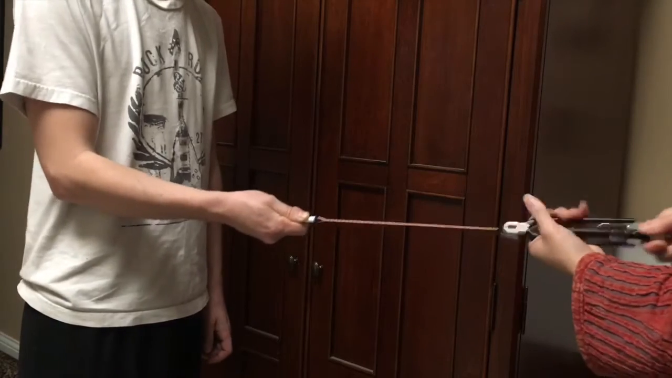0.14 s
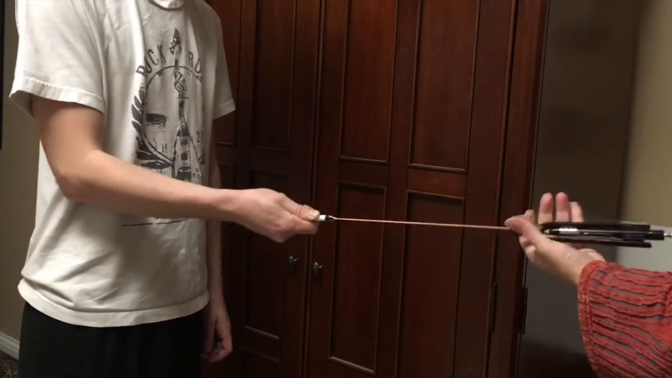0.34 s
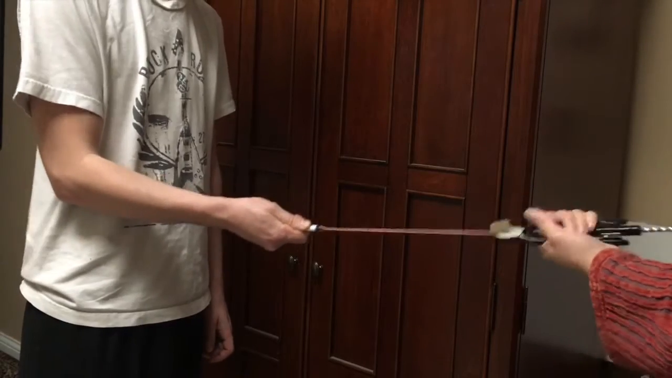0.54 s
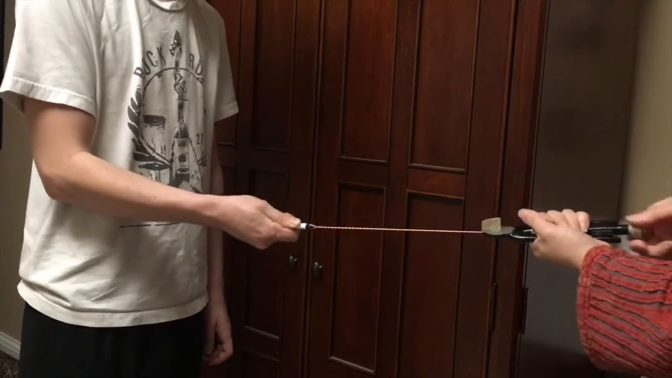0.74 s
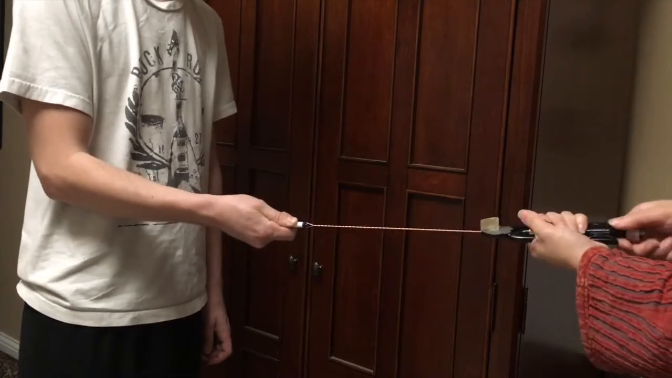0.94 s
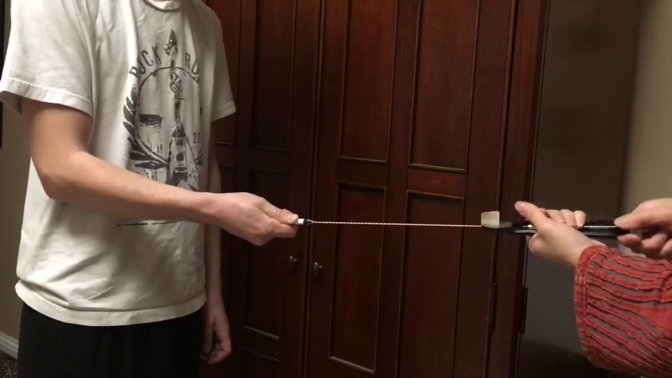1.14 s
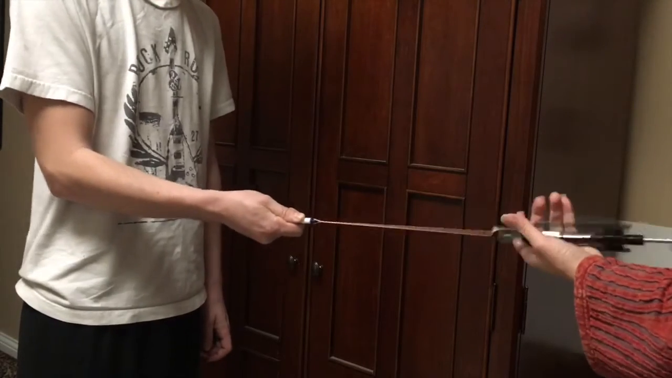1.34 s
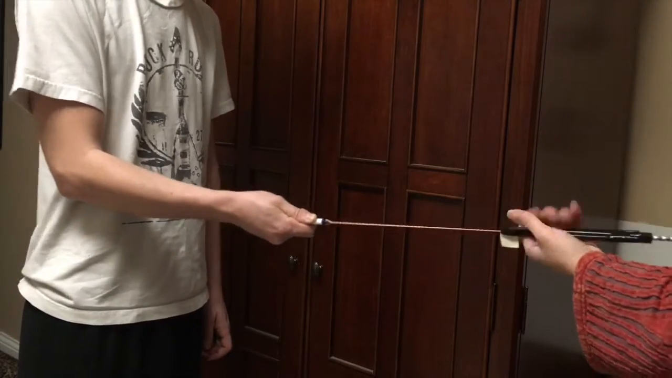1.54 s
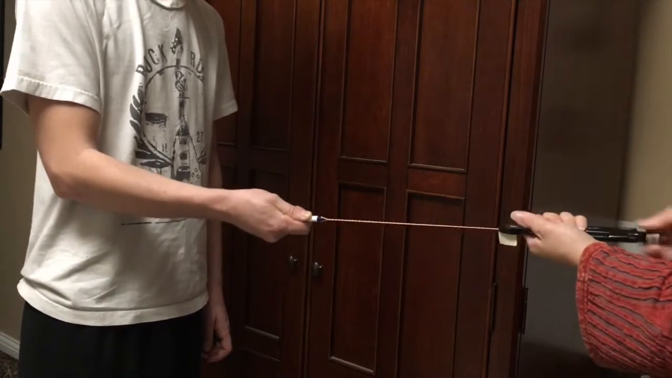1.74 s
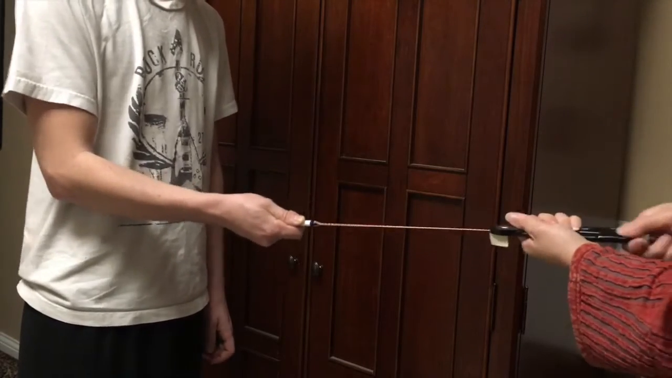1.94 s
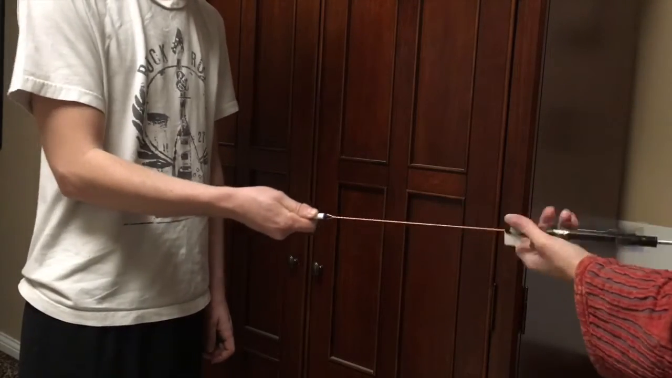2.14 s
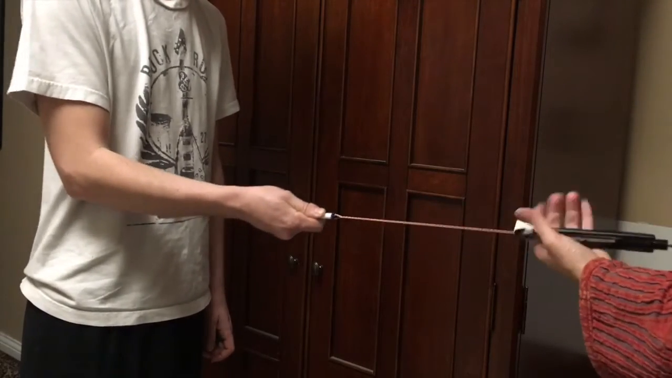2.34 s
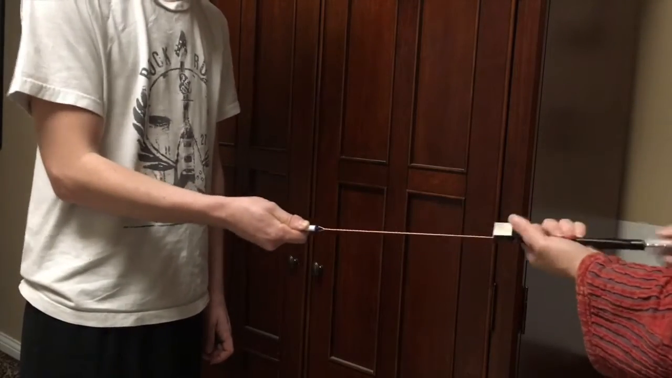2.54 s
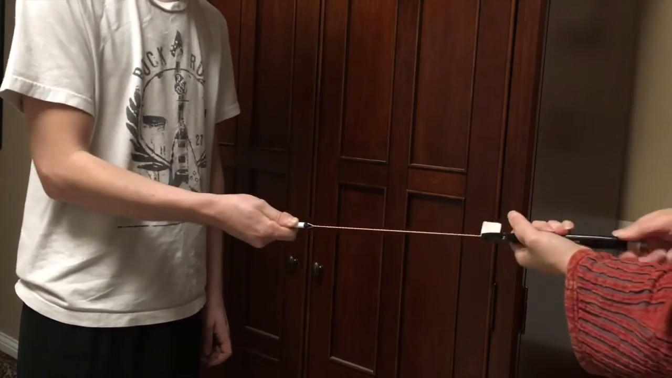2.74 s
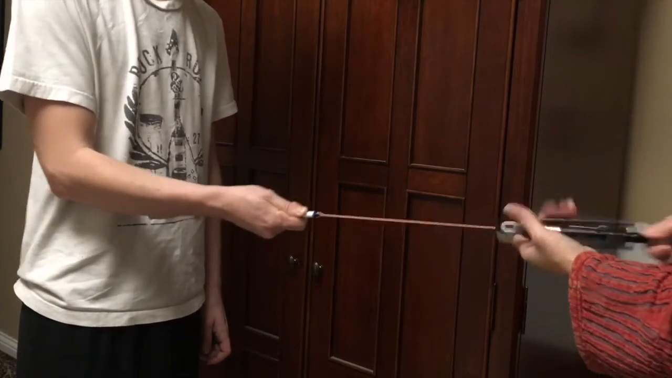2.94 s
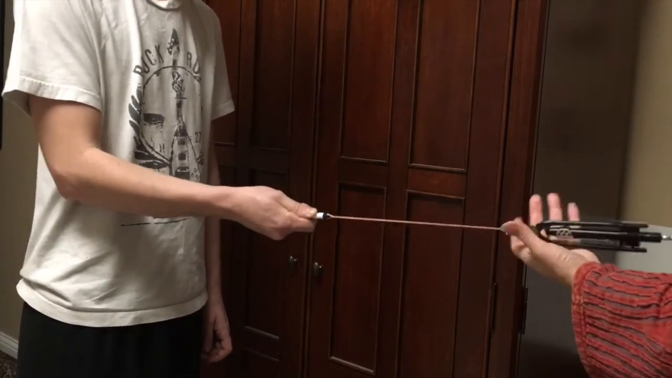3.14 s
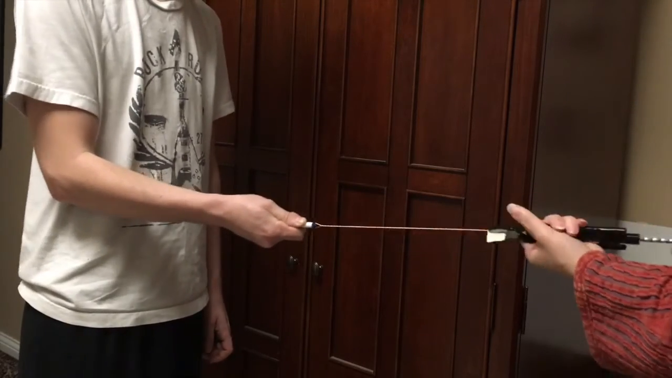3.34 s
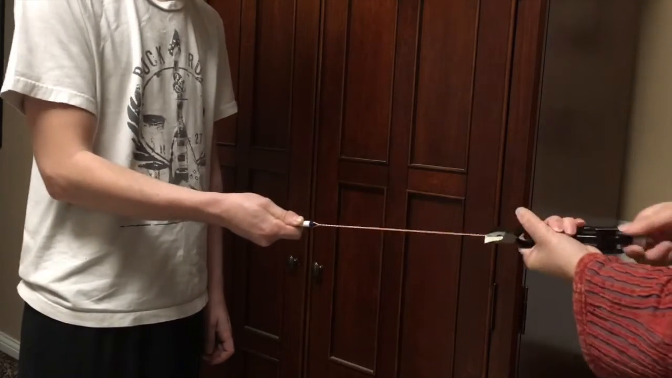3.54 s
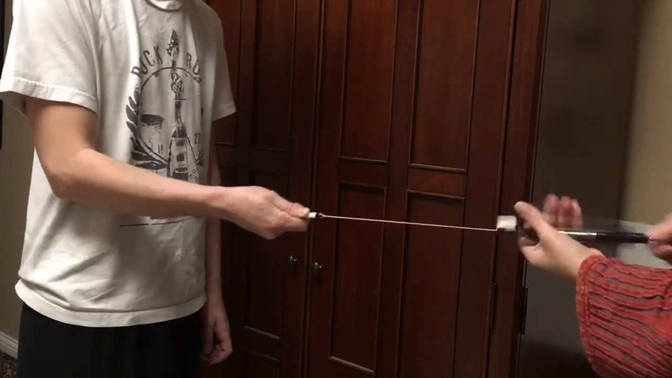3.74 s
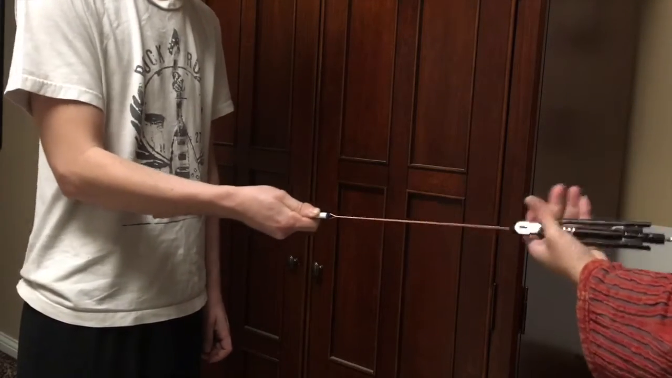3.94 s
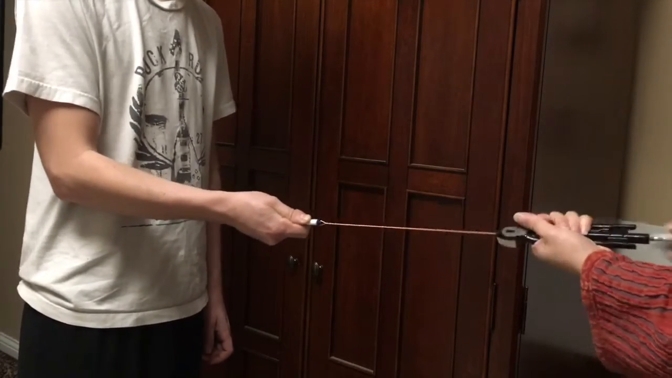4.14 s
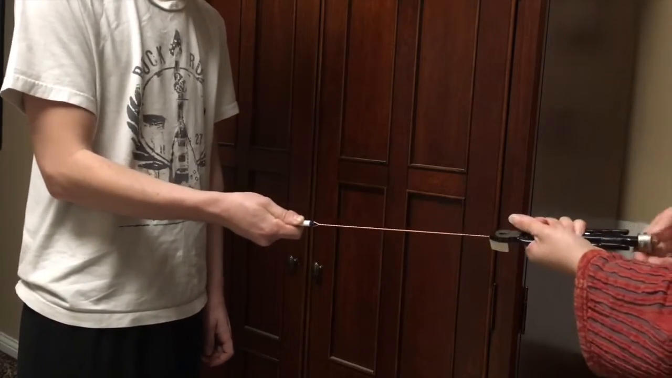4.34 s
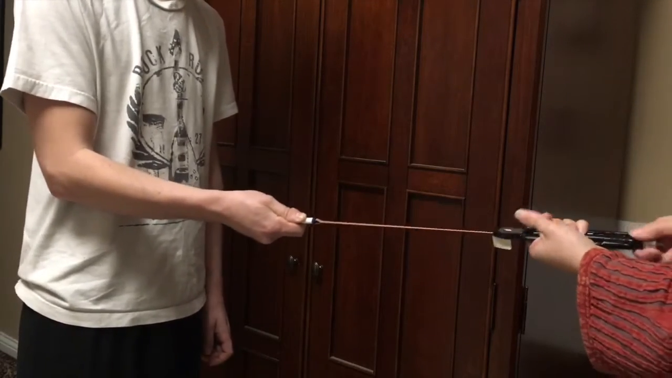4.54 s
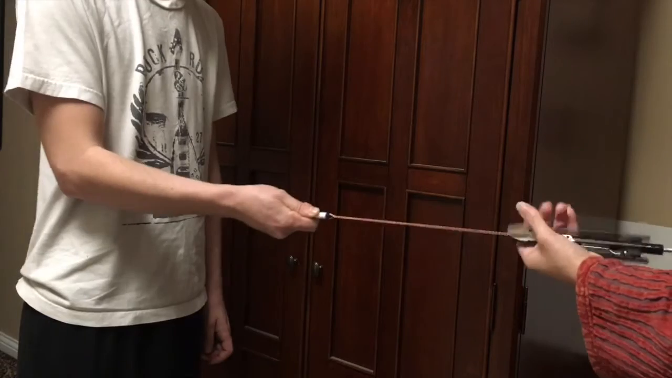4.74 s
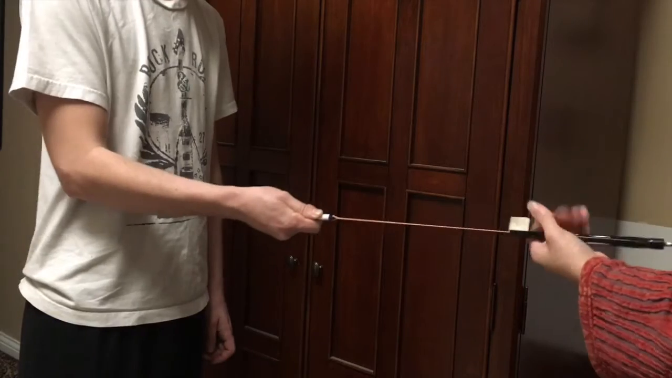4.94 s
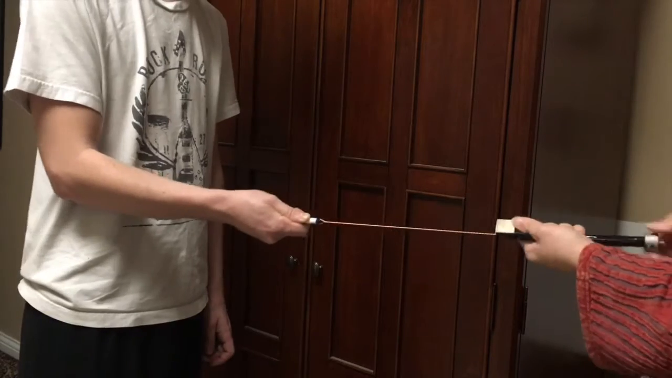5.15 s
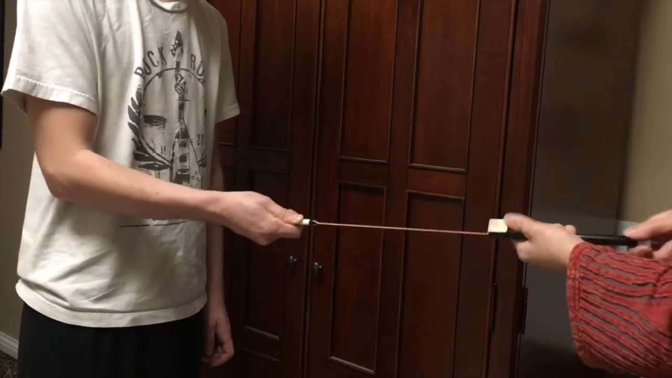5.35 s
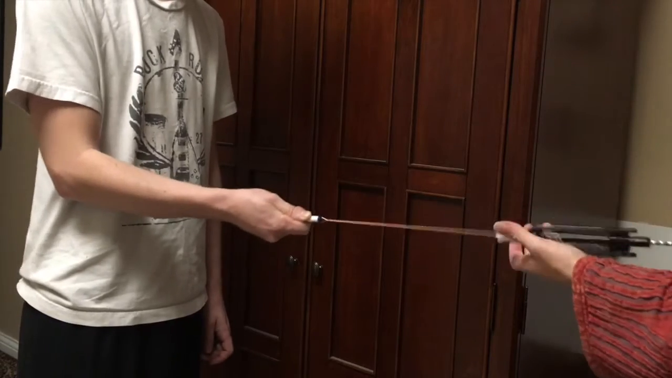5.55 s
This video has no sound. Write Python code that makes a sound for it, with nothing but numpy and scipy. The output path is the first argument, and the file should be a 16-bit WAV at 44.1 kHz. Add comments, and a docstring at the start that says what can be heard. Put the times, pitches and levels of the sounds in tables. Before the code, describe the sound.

A quiet indoor room with faint low motor hum, soft rumble and thin hiss. The ringing tail of a steel slam is already fading at the start. Hand-pumped twisting pliers then cycle: a brief gritty metallic rasp swells and ends in a thin bright click, at about 0.3, 1.4, 2.2, 3.1, 3.9, 4.8 and 5.6 seconds. The pull at 1.4 is longer, with palm rubbing around it. Most pulls carry a small loose double rattle. Light ticks follow as the hand catches the handles, then a very short rising slide and rattle lead into a hard, bright steel slam at roughly 0.7, 1.8, 2.6, 3.5, 4.2 and 5.2. Slams are by far the loudest, sharp and briefly ringing, with a quick rebound and short room tail. Soft grip shifts and faint bumps fill gaps; it ends just after the last click.

```python
"""A quiet room with a faint motor hum, and the last of a steel slam; then pliers twist a taut safety wire.
Pulls on the knob spin them on a spiral rod: a swelling rasp, in most pulls a rattle, a click at the end stop.
A hand catches them with small ticks; the rod slides home, rattles and slams into its seat; the grip shifts.
Scrapes and blows are shaped noise plus dying rings of the steel, heard in the room; the hum is a stack of
wavering tones; rumble, hiss, rubbing and soft bumps are filtered noise; a faint low drone glides now and then."""
import sys
import numpy as np
from scipy import signal
from scipy.fft import rfft, irfft
from scipy.io import wavfile
from scipy.ndimage import uniform_filter1d

SR = 44100
rng = np.random.default_rng(int(sys.argv[2]) if len(sys.argv) > 2 else 0)


def to_wav(sig):
    """Store sig (one row per channel, or 1-D mono) as 16-bit WAV at the path in sys.argv[1].

    Samples outside -1..1 are clipped; the rate is SR.
    """
    pcm = np.clip(np.atleast_2d(sig), -1, 1) * 32767
    pcm = np.round(pcm).astype(np.int16)
    wavfile.write(sys.argv[1], SR, pcm.T)  # frames by channels


N = 246959  # samples


def amp(db):
    """Turns decibels into a gain."""
    return 10 ** (np.asarray(db) / 20)


def unit(x):
    """Scales a sound to energy 1 (its squares add up to 1)."""
    return x / np.sqrt(np.sum(x ** 2) + 1e-20)


def evened(x):
    """Scales a sound to rms 1 (the average strength)."""
    return unit(x) * np.sqrt(len(x))


def struck(x):
    """Scales a blow to the energy of 3 ms of sound at rms 1."""
    return unit(x) * np.sqrt(.003 * SR)


def add(mix, s, sound):
    """Mixes a sound in at a time in seconds; whatever lies before zero is cut off."""
    at = round(s * SR)
    sound = sound[max(-at, 0):]
    part = mix[max(at, 0):][:len(sound)]
    part += sound[:len(part)]


def read(points, hz):
    """Reads a table of (pitch, value) between its points, along a log-frequency axis."""
    f, value = np.transpose(points)
    return np.interp(np.log(hz + 1), np.log(f + 1), value)


def causal(x, gain):
    """Filters without any sound ahead of its cause; gain covers the full frequency circle."""
    # minimum phase: the phase follows from the log of the gain
    spectrum = np.exp(np.conj(signal.hilbert(np.log(gain))))
    taps = np.fft.ifft(spectrum).real
    return signal.fftconvolve(x, taps[:len(gain) // 2])[:len(x)]


def colour(x, points, tilt_db=0, size=2048):
    """Gives a sound a spectrum; above 1500 Hz it is also tilted by tilt_db per octave around 5500 Hz."""
    hz = abs(np.fft.fftfreq(size, 1 / SR))
    octaves = np.log2(np.maximum(hz, 1500) / 5500)
    return causal(x, amp(read(points, hz) + tilt_db * octaves))


def swell(s, half_length_s, db, steepness=3.53):
    """A smooth rise and fall around one moment, down to 1/e half_length_s away from it."""
    distance = abs((np.arange(N) / SR - s) / half_length_s)
    return amp(db) * np.exp(-distance ** steepness)


def waver(rate_hz, count=20):
    """Slow random wandering of rms 1: many slow sines, the slower the stronger."""
    t = np.arange(0, N, 256) / SR
    rates = np.geomspace(rate_hz / 10, rate_hz, count)
    slow = sum(np.sin(2 * np.pi * (f * t + rng.random())) / np.sqrt(f) for f in rates)
    return evened(np.interp(np.arange(N) / SR, t, slow))


# colour of the room rumble: pitch_hz, level_db (per Hz, relative)
RUMBLE = [(20, -41.5), (35, -16), (55, 7), (110, 1), (290, 0.5), (380, -4), (550, -11), (900, -15),
          (1500, -27), (4000, -58.5)]
# colour of the hiss: pitch_hz, level_db (per Hz, relative)
HISS = [(300, -17.5), (1000, 15), (1600, 7), (4000, 5), (8000, 5), (15500, -15.5)]
RUMBLE_DB, HISS_DB = -63, -72.5
# faint low drones, one list a swell: time_s, pitch_hz, level_db
DRONES = [
    [(.7, 122, -69), (1.6, 114, -67), (2.1, 111.3, -62), (2.6, 121, -70.5)],
    [(2.9, 69.4, -73), (4.05, 80, -64.5), (4.9, 83.7, -67)],
]


def background():
    """Filtered noise makes room rumble and thin hiss; gliding sines make a faint drone."""
    out = amp(RUMBLE_DB) * evened(colour(rng.standard_normal(N), RUMBLE, size=8192))
    out += amp(HISS_DB) * evened(colour(rng.standard_normal(N), HISS))
    for points in DRONES:
        s, hz, db = np.transpose(points)
        at = np.arange(s[0], s[-1], 1 / SR)
        cycles = np.cumsum(np.interp(at, s, hz)) / SR
        tone = np.sqrt(2) * np.sin(2 * np.pi * cycles)
        fade = signal.windows.tukey(len(at), .15)
        add(out, s[0], amp(np.interp(at, s, db)) * tone * fade)
    return out


SHAFT_HZ = 23.96
# tones of the hum: multiple (of the shaft speed), level_db (before wavering)
HUM = [(5, -75), (6, -88.5), (7, -72), (8, -75), (9, -71.5), (10, -86), (11, -69.5), (13, -93), (34, -82),
       (41, -83.5)]
# the strongest tone, on its own multiple, swells and fades: time_s, level_db (before wavering)
HUM_MAIN = [(0.0, -65), (1.36, -55), (3.66, -64), (3.74, -59.5), (5.54, -62), (5.6, -76)]
HUM_MAIN_MULTIPLE = 12


def hum():
    """An appliance hums on multiples of its shaft speed; each tone wavers in level and phase."""
    t, out = np.arange(N) / SR, np.zeros(N)
    main_db = np.interp(t, *np.transpose(HUM_MAIN))
    for multiple, db in list(HUM) + [(HUM_MAIN_MULTIPLE, main_db)]:
        phase = 2 * np.pi * (round(multiple) * SHAFT_HZ * t + rng.random())
        level = np.sqrt(2) * amp(db + 1.8 * waver(rate_hz=5))
        out += level * np.sin(phase + 0.47 * waver(rate_hz=16))
    return out


# how long the room rings: pitch_hz, t60_s (time to fall by 60 dB)
ROOM = [(300, 0.249), (1500, 0.34), (4000, 0.36), (9000, 0.3), (12000, 0.18), (16000, 0.21)]
# first echoes: delay_s, gain
ECHOES = [(.0026, 0.22), (.0056, 0.22), (.0077, 0.18), (.0098, .18), (0.0145, 0.05)]


def room(x, wet_db):
    """Direct sound, a few early echoes, and a scattered tail of noise that dies at its own pace per pitch."""
    t = np.arange(SR // 2) / SR
    hz, at, z = signal.stft(rng.standard_normal(len(t)), SR, nperseg=256)
    fading = amp(-60 * at / read(ROOM, hz)[:, None])
    tail = signal.istft(z * fading, SR)[1][:len(t)]
    build_up = 1 - np.exp(-t / 0.0028)
    response = amp(wet_db) * unit(tail * build_up)
    response[0] += 1
    for s, gain in ECHOES:
        add(response, s, np.array([gain]))
    return signal.fftconvolve(x, response)


def ring(hz, t60):
    """One dying tone of energy 1 that builds up over about its first cycle."""
    t = np.arange(SR // 3) / SR
    tone = np.sin(2 * np.pi * (hz * t + rng.random()))
    build_up = 1 - np.exp(-hz * t)
    return unit(tone * build_up * np.exp(-np.log(1000) * t / t60))


def cluster(hz, t60, count=6):
    """A group of close, damped tones, strongest in the middle."""
    spread = np.linspace(.945, 1.055, count) + rng.uniform(-.006, .006, count)
    weights = np.hanning(count + 2)[1:]
    return unit(sum(ring(hz * k, t60) * weight for k, weight in zip(spread, weights)))


# ringing tones of the steel tool, damped by the hands: pitch_hz, level_db (relative, before a random change)
STEEL = [(1700, -8), (2448, -3), (2503, -22), (2804, -10), (3076, -2), (3428, -2.5), (3591, -11.5),
         (4134, -8), (4330, -12.5), (5471, 16), (5947, -20), (6297, -37), (6835, -11), (7046, 7.5),
         (7600, 7), (9631, -8.5), (9850, -9.5), (9975, -4), (11363, 21), (11669, -8)]
STEEL_T60 = .22  # s


def steel():
    """The tool's ringing tones; every call shares the energy among them a little differently."""
    return unit(sum(amp(db + 2 * rng.standard_normal()) * ring(hz, STEEL_T60) for hz, db in STEEL))


def contact(crack_s, chatter_db, chatter_s, size=2048):
    """Steel meets steel: a burst of noise that dies at two paces, crack and chatter, evened over all pitches."""
    t = np.arange(SR // 3) / SR
    envelope = np.exp(-t / crack_s) + amp(chatter_db) * np.exp(-t / chatter_s)
    burst = rng.standard_normal(len(t)) * envelope
    power = uniform_filter1d(abs(np.fft.fft(burst, size)) ** 2, size=15, mode="wrap")
    return unit(causal(burst, 1 / np.sqrt(power)))


def grit(length, per_s, count=32):
    """Tiny slips of uneven size, each ringing for 35 cycles at its own pitch; high ones come thicker."""
    out, pitches = np.zeros(length), np.geomspace(1800, 15500, count)
    for hz in pitches:
        happens = rng.random(length) < per_s * hz / pitches.sum() / SR
        slips = rng.uniform(0.11, 1, length) * happens
        chirp = ring(hz * rng.uniform(.95, 1.05), t60=35 / hz)
        out += signal.fftconvolve(slips, chirp[:length])[:length]
    return evened(out)


SNAGS_PER_S, SNAG_DB = 110, -3.5  # average count; level beside the steady scraping


def snags(length):
    """The rod snags in its sleeve: brief spurts of noise at random moments."""
    starts = rng.uniform(.3, 1, length) * (rng.random(length) < SNAGS_PER_S / SR)
    spurt = np.exp(-np.arange(SR // 100) / SR / .0007)
    return evened(signal.fftconvolve(starts, spurt)[:length] * rng.standard_normal(length))


# colour of scraping steel: pitch_hz, level_db (per Hz, relative)
RASP = [(200, -57.5), (1000, -5), (1600, 1), (2500, 3), (3600, 3.5), (4250, 8.5), (4800, -2), (5600, 8),
        (7600, -0.5), (10000, 6.5), (10800, 3.5), (12100, 6), (14300, 6), (15550, 9.5)]
ROD_HZ, ROD_T60, ROD_DB = 4280, 0.27, -20.5  # the rod's own song: Hz, s, dB


def rasp(level_db, ring_db):
    """The spiral rod grabs and slips in its sleeve; the scraping sets tool and rod ringing."""
    length = len(level_db)
    wander = evened(uniform_filter1d(rng.standard_normal(length), size=160))
    grab_db = 2.6 * np.tanh(wander)
    drive = (.5 * rng.standard_normal(length) + grit(length, per_s=2600)) * amp(grab_db)
    drive = evened(drive) + amp(SNAG_DB) * snags(length)
    scrape = evened(colour(drive, RASP)) * amp(level_db)
    scrape = np.pad(scrape, (0, SR // 4))  # time for the rings to die
    rings = amp(ring_db) * steel() + amp(ROD_DB) * cluster(ROD_HZ, ROD_T60)
    return scrape + signal.fftconvolve(scrape, rings)[:len(scrape)]


SLIDE_S, SLIDE_RISE_DB = .072, 11.5


def slides():
    """Before each slam the rod slides back with a rasp that grows steadily louder."""
    out = np.zeros(N)
    rising_db = np.linspace(-SLIDE_RISE_DB, 0, round(SLIDE_S * SR))
    for s, *_, slide_db, _ in SLAMS:
        add(out, s - SLIDE_S, room(rasp(slide_db + rising_db, ring_db=-18), wet_db=-2.5))
    return out


def settling():
    """The rod settles: tiny bounces at random moments, dying away."""
    t = np.arange(SR // 3) / SR
    bounces = rng.standard_normal(len(t)) * (rng.random(len(t)) < 430 / SR)  # about 430 a second
    return unit(bounces * np.exp(-t / 0.066))


# colour of the slam: pitch_hz, level_db (per Hz, relative)
SLAM = [(150, -53), (500, -18.5), (1100, -15.5), (1600, 1), (2050, -3), (2500, 5), (4600, 4), (6500, 7),
        (8300, 2.5), (9800, 10.5), (10700, 7), (13500, 2), (15600, 2.5)]
# the rod slams home: start_s, level_db, rebound_after_s, rebound_db (beside the blow),
# treble_tilt_db (per octave), ring_hz, ring_db (beside the blow), ring_t60_s,
# slide_db (end of the slide before it, without rings), grip_db (peak of the grip shift after it)
SLAMS = [(-.075, -19.5, 0.0041, -19, 0, 5510, -6.5, .025, -28.5, -56.5),
         (.7111, -13, 0.0063, -4.5, 0.5, 3480, -12.5, 0.093, -39, -67),
         (1.7980, -15.5, 0.0028, -20, -0.56, 5400, -10.5, 0.016, -40.5, -56.5),
         (2.6355, -14, 0.0049, 4, 0.5, 5700, -18, 0.028, -41, -69.5),
         (3.4981, -15, .006, -11.5, 0, 4120, -7, 0.081, -39, -61.5),
         (4.2405, -14.5, .003, -10, -0.7, 6800, -12, 0.0077, -42, -64),
         (5.1873, -14.5, .0053, 2.5, -0.5, 5840, -8.5, 0.028, -41, -62.5)]


def slams():
    """The rod hits its seat, rebounds once and settles; the seat adds its own high ring."""
    out = np.zeros(N)
    for s, db, rebound_s, rebound_db, tilt_db, ring_hz, ring_db, ring_t60, _, _ in SLAMS:
        blow = contact(crack_s=0.0084, chatter_db=-1, chatter_s=0.0091)
        rebound = contact(crack_s=0.00097, chatter_db=-24, chatter_s=0.0024)
        add(blow, rebound_s, amp(rebound_db) * rebound)
        blow = unit(blow) + amp(-17) * settling()
        rings = amp(-17.5) * steel()
        rings += amp(ring_db) * cluster(ring_hz, ring_t60)
        rings += amp(-11) * cluster(hz=9440, t60=0.027)
        slam = amp(db) * struck(unit(colour(blow, SLAM, tilt_db)) + rings)
        # the room comes first, so a slam before zero still leaves its tail
        add(out, s, room(slam, wet_db=-2))
    return out


# colour of skin and cloth: pitch_hz, level_db (per Hz, relative)
CLOTH = [(70, 4), (190, 4.5), (400, 0.5), (900, -3.5), (1600, -0.5), (4000, 1.5), (8000, -4),
         (14000, -12.5), (16000, 2.5)]
# the spinning handles rub along the palm: peak_s, half_length_s, level_db (at the peak)
PALM_RUBS = [(1.369, 0.12, -44), (1.543, 0.095, -58)]
# soft bumps and scuffs as people move: peak_s, half_length_s, pitch_hz, width_hz, level_db (at the peak)
SCUFFS = [(.17, .03, 97, 20, -60), (0.22, 0.039, 1480, 690, -57), (0.41, 0.056, 96.7, 27, -57),
          (1.285, 0.055, 182, 56, -56)]
# the grip shifts a moment after each slam, and the fingers whisper on the steel (half lengths)
GRIP_AFTER_S, GRIP_HALF_S, HOLD_HALF_S, HOLD_DB = 0.27, 0.08, .17, -67


def brushes():
    """Skin and cloth rub, fingers whisper on steel and people bump softly: noise that swells and fades."""
    hz = np.fft.rfftfreq(N, 1 / SR)
    pressure = sum(swell(*rub) for rub in PALM_RUBS)
    pressure += sum(swell(s + GRIP_AFTER_S, GRIP_HALF_S, grip_db) for s, *_, grip_db in SLAMS)
    holding = sum(swell(s + GRIP_AFTER_S, HOLD_HALF_S, HOLD_DB) for s, *_ in SLAMS)
    out = pressure * evened(colour(rng.standard_normal(N), CLOTH))
    out += holding * evened(colour(rng.standard_normal(N), RASP))
    for s, half_length, centre, width, db in SCUFFS:
        band_gain = 1 / (1 + (2 * (hz - centre) / width) ** 2)
        band = irfft(rfft(rng.standard_normal(N)) * band_gain, N)
        out += swell(s, half_length, db) * evened(band)
    return out


# the rasp sags until the stop, is jolted there and dies as the pliers coast
DB_PER_DOUBLED_SPEED, SAG_S, SAG_DB = 8.5, .052, -8
JOLT_DB, COAST_DB_PER_S, COAST_S = 5.5, 208, 0.12


def spin_db(t, run_up_s):
    """Loudness of the rasp at times t from the end stop: an even run-up in speed, a sag, then coasting."""
    speed = np.clip(1 + (t + SAG_S) / run_up_s, .01, 1)
    driven = DB_PER_DOUBLED_SPEED * np.log2(speed) + np.interp(t, [-SAG_S, 0], [0, SAG_DB])
    return np.where(t < 0, driven, SAG_DB + JOLT_DB - COAST_DB_PER_S * t)


# colour of the end-stop click: pitch_hz, level_db (per Hz, relative)
STOP = [(300, -53), (1200, -23), (2200, -25.5), (3100, -5), (5800, -1), (7500, -13.5), (10000, -0.5),
        (10800, -8.5), (12000, 9), (14000, -19), (14900, 7.5), (15500, 18.5), (17000, 2.5)]
# pulls on the knob: stop_s (end stop reached), click_db, run_up_s, rasp_db (at full spin, before the sag)
PULLS = [(0.32, -27.5, .009, -41), (1.4007, -27, .137, -41), (2.237, -26.5, 0.068, -48),
         (3.1102, -22, .07, -42), (3.9037, -22.5, 0.071, -44), (4.823, -24.5, .07, -43),
         (5.592, -23, 0.046, -42.5)]


def pulls():
    """The pliers whirl on the rod with a rasp and meet the end stop with a thin, bright click."""
    out = np.zeros(N)
    for s, click_db, run_up_s, rasp_db in PULLS:
        t = np.arange(-SAG_S - run_up_s, COAST_S, 1 / SR)
        add(out, s + t[0], rasp(rasp_db + spin_db(t, run_up_s), ring_db=-17.5))
        blow = unit(colour(contact(crack_s=0.0022, chatter_db=-15.0, chatter_s=0.0045), STOP))
        add(out, s, amp(click_db) * struck(blow + amp(-20.5) * steel()))
    return room(out, wet_db=-7.5)[:N]


RATTLE_GAP_S, RATTLE_SECOND_DB = .0055, 1  # the second knock follows, slightly louder
# rattles during most spins and just short of the seat: start_s, level_db (first knock)
RATTLES = [(0.2766, -35.5), (0.6898, -32), (1.766, -33), (2.193, -40.5), (2.258, -41.5), (2.6107, -31.5),
           (3.056, -34), (3.4695, -32), (3.844, -37), (4.217, -30), (4.762, -40), (5.164, -32.5),
           (5.54, -36.5)]


def rattles():
    """The loose rod knocks twice in its sleeve, each knock ringing at a random pitch."""
    out = np.zeros(N)
    for s, db in RATTLES:
        for after_s, knock_db in [(0, 0), (RATTLE_GAP_S, RATTLE_SECOND_DB)]:
            blow = unit(colour(contact(crack_s=.0011, chatter_db=-9.5, chatter_s=0.0036), RASP))
            spot = amp(-7) * cluster(rng.uniform(2200, 7000), t60=.012)
            knock = struck(blow + spot + amp(-16.5) * steel())
            add(out, s + after_s, amp(db + knock_db) * knock)
    return room(out, wet_db=-4.5)[:N]


# colour of the ticks: pitch_hz, level_db (per Hz, relative)
TICK = [(300, -30.5), (1500, -23.5), (3000, -7.5), (5500, -1.5), (9000, -3), (11500, 4), (13500, 0),
        (15600, 14.5)]
# the hand catches and holds the pliers: start_s, level_db, treble_tilt_db (per octave),
# ring_hz, ring_db (beside the tick)
TICKS = [(.5436, -27.5, 3, 7370, -10), (.587, -35.5, -7, 5300, -7.5), (0.655, -38.5, -8, 4160, -12),
         (1.072, -57.5, -12.5, 5180, -10), (1.681, -51.5, -9, 4750, -4.5), (1.687, -45.5, -8.5, 5240, -3),
         (2.4845, -37, 1, 9300, -17), (2.5086, -38, -2.5, 5620, -13), (3.326, -38, 5, 5720, -23),
         (3.3534, -37, 2, 5600, -27), (3.362, -43, -7.5, 5930, -4.5), (3.373, -49, -11.5, 4120, 2),
         (4.1485, -30, -4, 4870, -11), (4.175, -39, -11.5, 5400, 3.5), (4.182, -37.5, -7, 6670, 2),
         (5.053, -44, -1.5, 5900, -19), (5.0901, -42.5, -9, 5800, -6), (5.1134, -41, 0, 5450, -14)]


def ticks():
    """Light ticks of the gripped handles, each a tiny contact with one short ring."""
    out = np.zeros(N)
    for s, db, tilt_db, hz, ring_db in TICKS:
        touch = contact(crack_s=0.00037, chatter_db=-9.5, chatter_s=0.0033)
        tick = unit(colour(touch, TICK, tilt_db))
        add(out, s, amp(db) * struck(tick + amp(ring_db) * cluster(hz, t60=.008)))
    return room(out, wet_db=-3.5)[:N]


def scene():
    """The pliers at work in the quiet room."""
    quiet = background() + hum()
    tool = slides() + slams() + pulls() + rattles() + ticks()
    return (quiet + tool + brushes())[None]


# top-end colour: pitch_hz, level_db
TOP_END = [(20, 0), (15650, 0), (16000, -26), (17000, -36)]
EDGE_HZ = 17100


def record(dry):
    """The very top is dulled, then a steep low-pass ends the sound at EDGE_HZ."""
    low_pass = signal.firwin(511, EDGE_HZ, window=("kaiser", 9), fs=SR)
    return signal.oaconvolve(colour(dry[0], TOP_END), low_pass, "same")[None]


dry = scene()
out = record(dry)
to_wav(out)
```